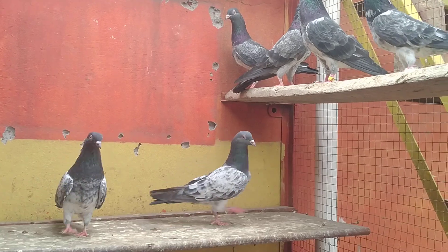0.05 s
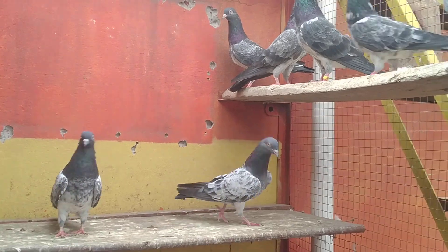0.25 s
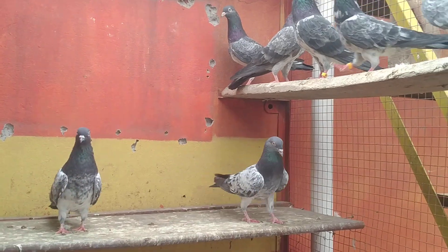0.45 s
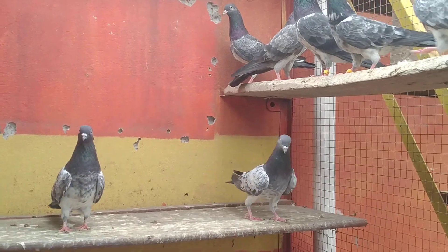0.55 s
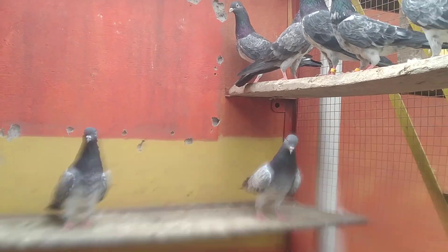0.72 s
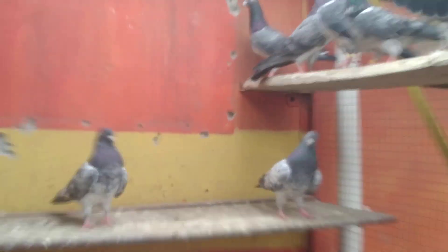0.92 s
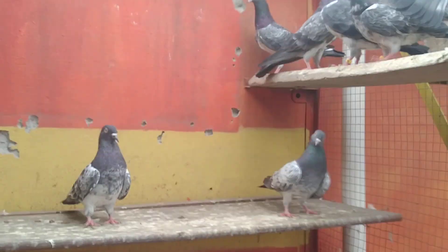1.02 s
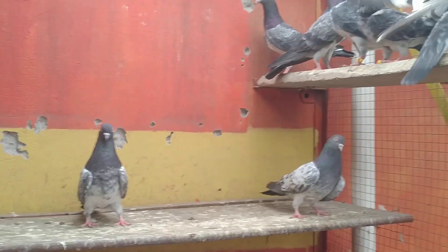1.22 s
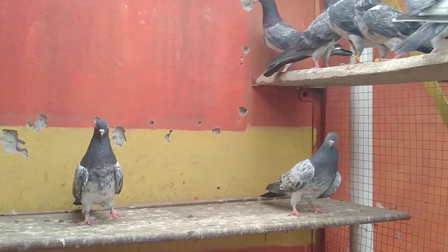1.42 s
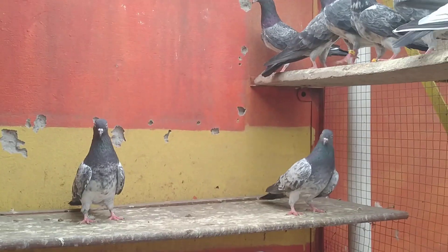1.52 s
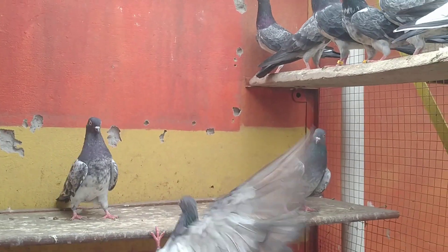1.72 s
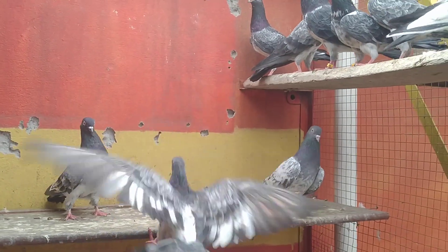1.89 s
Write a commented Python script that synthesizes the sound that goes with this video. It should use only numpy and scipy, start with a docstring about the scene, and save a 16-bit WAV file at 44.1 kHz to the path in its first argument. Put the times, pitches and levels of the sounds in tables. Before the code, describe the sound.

Pigeon wings clap and rattle in rapid irregular strokes after a near-silent start; midway one bird passes very close, its air blast buffeting and overloading the microphone with thuds, then flapping thins out in a small loft.

```python
"""Pigeons beat their wings in a small loft: each stroke is a snap of the wing tips, a short burst of
feather rattle and a tail off the walls, the last two made of noise in three bands.
One bird passes close: its downwash buffets the microphone and pins the diaphragm against its stop for
moments. Wings and feet thud on boards as damped rings; the noisy rustle of the flock and a faint
near-sine coo lie below."""
import sys
import numpy as np
from scipy import signal
from scipy.io import wavfile

SR = 44100
rng = np.random.default_rng(int(sys.argv[2]) if len(sys.argv) > 2 else 0)


def file_out(sig):
    """Save sig as 16-bit WAV at sys.argv[1]."""
    # one column per channel
    cols = np.atleast_2d(sig).T
    # limit, then scale
    lim = np.clip(cols, -1, 1)
    pcm = np.round(lim * 32767).astype(np.int16)
    wavfile.write(sys.argv[1], SR, pcm)


N = 85995
STOP = 1.0      # how far the diaphragm can move inward, in units of full scale
JUMP_S = .0007  # time the diaphragm takes for a sudden move


def undb(db):
    """Turn decibels into a gain; twice the decibels give the gain in power."""
    return 10 ** (np.asarray(db) / 20)


def rms_one(x):
    """Scale a signal to an rms of 1."""
    return x / np.sqrt(np.mean(x ** 2) + 1e-20)


def in_time(rows):
    """Draw straight lines between table rows (time first); one curve for each other column."""
    s, *columns = np.transpose(rows)
    return [np.interp(np.arange(N) / SR, s, c) for c in columns]


def drift(rate_hz):
    """A slow random wander of rms 1: noise smoothed twice, its first second thrown away."""
    r = np.exp(-2 * np.pi * rate_hz / SR)
    slow = signal.lfilter([1], [1, -2 * r, r * r], rng.standard_normal(N + SR))
    return rms_one(slow[SR:])


def coloured(spectrum, patch_db):
    """Noise of rms 1 in third-octave bands; the bands take turns at two noises and four flickers."""
    hz, db = np.transpose(spectrum)
    edges = hz[0] * 2 ** np.arange(0, np.log2(hz[-1] / hz[0]) + 1 / 3, 1 / 3)
    white = rng.standard_normal((2, N))
    flicker = [drift(25) for _ in range(4)]
    out = 0
    for k, (low, high) in enumerate(zip(edges, edges[1:])):
        band_filter = signal.butter(2, [low, high], "band", fs=SR, output="sos")
        band = signal.sosfilt(band_filter, white[k % 2])
        band_db = np.interp(np.log(low * high) / 2, np.log(hz), db)
        out = out + band * undb(band_db + patch_db * flicker[k % 4])
    return rms_one(out)


def wings():
    """Each stroke snaps sharply; its rattle and wall tail add in power to the rustle, in three bands."""
    # when each wing stroke starts: start_s [s]
    stroke_starts = [.102, .1592, .1772, .2028, .2852, .2966, .3396, .4091, .4356, .5113, .5887, .6286,
                     .676, .7518, .7688, .806, .8521, .9, .9274, .954, .9915, 1.0437, 1.0557, 1.0851, 1.118,
                     1.143, 1.1619, 1.2238, 1.2447, 1.2667, 1.311, 1.329, 1.356, 1.4333, 1.5361, 1.5785,
                     1.6398, 1.6817, 1.7361, 1.8299, 1.908]
    # how each stroke sounds: treble_db [dB], middle_db [dB re treble], bass_db [dB re treble],
    # rattle_s [s], snap_db [dB re treble]; treble_db is the stroke's reference level
    strokes = [(-39, -31, -31, .006, -9), (-27, -17, -16, .008, -16), (-17, -7.5, -18.5, .004, -2),
               (-4.5, -17, -25.5, 0.0077, -1), (-19, -14.5, -17, .003, -1), (-13.5, -22, -15, 0.0071, -11),
               (-7, -8, -16, 0.0045, -20), (-16.5, -18, -7.5, 0.027, -12), (-22.5, 1, -12, 0.0064, -1),
               (-24.5, -1.5, -3.5, 0.005, -17), (-17, -5.5, -8, 0.0053, -9.5), (-37, -14, -19, .006, -11),
               (-15, -11, -11.5, 0.003, -5), (-6.5, -11.5, -24, 0.0015, 0), (-10.5, -11, -12, 0.002, -6.5),
               (-14, -2, -3, 0.004, -9), (-15.5, -25, -26, 0.0061, -13), (-8, -3.5, 1.5, .005, 5.5),
               (-27, -4, 15, 0.0024, -6), (-10.5, -14, -8, 0.015, -7), (-7, -3.5, -7.5, 0.02, -8),
               (-25, -19, 11, 0.0035, -2), (-8.5, -2.5, 0, .004, 1), (-13.5, 1.5, 2.5, 0.018, -1),
               (-9.5, -4.5, -28, .003, -0.5), (-9, -2.5, -4, 0.0042, -12), (-7.5, -13, -29, 0.0035, -1.5),
               (-14.5, -8, -5, 0.011, 0), (-14, -4, -8, 0.015, -16), (-7.5, -16, -18.5, 0.0025, 2),
               (-21.5, 4, -3, 0.0028, -7), (-8.5, -6.5, -12, 0.0018, -10.5), (-17, -3, -18, 0.012, -4),
               (-8.5, -9.5, -21, 0.011, -18), (-11.5, -9, -14, 0.011, -2), (-15.5, -5.5, -15, 0.0059, 5),
               (-22, 1.5, -12, 0.0087, -9), (-12, -5.5, -10, 0.008, -0.5),
               (-17.5, -8.5, -18.5, 0.0056, -20), (-23, -9, -19, 0.0074, 0), (-34.5, -9, -24, .006, -6)]
    # trim of treble, middle and bass: trim_db [dB]
    band_trim = [-1.5, 1, 2.5]
    # colour of the feather noise in each band: frequency_hz [Hz], level_db [dB per Hz, shape only]
    treble = [(1470, -30), (2500, -5.5), (3900, -4), (4450, -3), (5770, -1), (6450, -11), (7000, -29.5),
              (9100, -49), (15400, -120)]
    middle = [(650, -16), (1100, 0), (1340, 0.5), (1990, -2.5), (3000, -11.5), (3900, -38), (6600, -120)]
    bass = [(120, -56), (200, -14.5), (448, -2), (637, -1), (700, 0), (1300, -9), (1690, -25), (2860, -120)]
    patch_db = 1.5  # flicker of the noise bands

    t = np.arange(SR // 2) / SR
    flutter = feather_flutter()
    tick = snap(t)
    tail = wall_tail(t)
    snaps = np.zeros(N + SR)
    power = np.zeros((3, N + SR))
    sides = rng.choice([-1, 1], len(strokes))  # each snap pushes or pulls
    for s, (db, middle_db, bass_db, rattle_s, snap_db), side in zip(stroke_starts, strokes, sides):
        i = int(s * SR)
        span = slice(i, i + len(t))
        snaps[span] += side * undb(db + snap_db) * tick
        burst = rattle(t, rattle_s) * flutter[span]
        gains = undb(2 * (db + np.array([0, middle_db, bass_db]) + band_trim))
        power[:, span] += gains[:, None] * (burst + tail)
    power = power[:, :N] + flutter[:N] * rustle()
    noises = [coloured(colour, patch_db) for colour in (treble, middle, bass)]
    return snaps[:N] + sum(np.sqrt(p) * noise for p, noise in zip(power, noises))


def snap(t):
    """The wing tips snap: a 3 kHz ring that dies almost at once, with a peak of 1."""
    decay_s, pitch_hz = 0.00015, 3000
    tick = np.exp(-t / decay_s) * np.sin(2 * np.pi * pitch_hz * t)
    return tick / tick.max()


def rattle(t, rattle_s):
    """Power of the feather rattle: a fast rise, a steady sag, then a steeper fall after rattle_s."""
    rise_s, level_db = 0.00037, -8.5
    sag_db_per_s, fall_t60_s = 397.5, 0.04  # the fall comes on top of the sag
    fall_db = 60 * np.maximum(t - rattle_s, 0) / fall_t60_s
    return undb(2 * (level_db - sag_db_per_s * t - fall_db)) * np.minimum(t / rise_s, 1) ** 2


def wall_tail(t):
    """Power of the sound off the walls: it builds up softly and dies away evenly in decibels."""
    level_db, t60_s, rise_s = -14.5, 0.19, 0.012
    return undb(2 * (level_db - 60 * t / t60_s)) * (1 - np.exp(-t / rise_s))


def feather_flutter():
    """Quick random flutter of the feather noise, as a power of mean 1, with room after the end."""
    rate_hz, depth_db = 500, 1.8
    flutter = undb(2 * depth_db * drift(rate_hz))
    return np.append(flutter / flutter.mean(), np.ones(SR))


def downwash():
    """Air from the close bird: lumpy low turbulence and rumble, a suction and sudden puffs."""
    # downwash on the microphone port: time_s [s], buffeting_db [dB], rumble_db [dB]
    wash_levels = [(0.0, -58.5, -72), (0.13, -65.5, -73), (0.172, -48.5, -70), (0.216, -48, -53),
                   (0.238, -49, -58), (0.282, -41, -49), (0.314, -49, -64), (0.358, -36.5, -64),
                   (0.384, -55, -65), (0.456, -38, -65), (0.498, -52, -69), (0.532, -41, -47.5),
                   (0.624, -46, -56), (0.668, -68, -56), (0.7, -41.5, -49), (0.722, -34, -40),
                   (0.748, -33.5, -50), (0.782, -47.5, -50), (0.802, -20.5, -34), (0.814, -24.5, -41.5),
                   (0.836, -41, -27), (0.858, -37, -41), (0.878, -38, -45), (0.9, -31, -33),
                   (0.944, -19.5, -18), (0.976, -16, -31), (1.014, -29, -38.5), (1.032, -33, -31),
                   (1.042, -35, -42), (1.058, -30, -29), (1.07, -9, -13), (1.09, -17.5, -22),
                   (1.112, -19, -32), (1.134, -30.5, -26), (1.15, -21, -30.5), (1.184, -32, -38),
                   (1.204, -31, -31), (1.226, -40, -32), (1.264, -26.5, -43), (1.292, -43, -52),
                   (1.314, -41, -56), (1.362, -35, -43), (1.394, -41.5, -51), (1.476, -40.5, -50.5),
                   (1.492, -54, -49), (1.514, -69, -48), (1.558, -45, -52.5), (1.64, -47, -44.5),
                   (1.678, -43, -44), (1.77, -42.5, -67), (1.808, -40.5, -61), (1.846, -45, -53),
                   (1.872, -43, -60), (1.95, -49, -62)]
    # colour of the turbulence: frequency_hz [Hz], level_db [dB per Hz, shape only]
    wash_colour = [(76, -24.5), (130, -4), (259, 0.5), (501, -6), (797, -7), (1200, -17.5), (1560, -50),
                   (2640, -120)]
    # edges of the rumble band: edge_hz [Hz]
    rumble_edges = [50.9, 125]
    lump_db, lump_hz = 2.0, 40  # depth and rate of the lumps

    buffeting_db, rumble_db = in_time(wash_levels)
    rumble_filter = signal.butter(2, rumble_edges, "band", fs=SR, output="sos")
    rumble = rms_one(signal.sosfilt(rumble_filter, rng.standard_normal(N)))
    lumps = undb(buffeting_db + lump_db * drift(lump_hz))
    turbulence = lumps * coloured(wash_colour, 2.0)
    return turbulence + undb(rumble_db) * rumble + suction() + puffs()


def suction():
    """Suction leans the diaphragm inward, pulls it well past its stop for moments and lets it go."""
    # diaphragm pinned: start_s [s], end_s [s], jump_onto_stop [full scale], jump_off_stop [full scale]
    pinned = [(.9048, .9207, .3, .07), (.9225, .927, .07, .3), (.939, .9435, .35, .2),
              (1.0068, 1.0432, .5, .75), (1.058, 1.0745, .5, .35), (1.0768, 1.082, .15, .15),
              (1.094, 1.1108, .15, .12)]
    lean_s = .06  # time to lean in before the first pin and to recover after the last
    points = [(0, 0), (pinned[0][0] - lean_s, 0)]
    for start, end, onto, off in pinned:
        points += [(start - JUMP_S, onto - STOP), (start, -STOP), (start + JUMP_S / 2, -4 * STOP)]
        points += [(end - JUMP_S / 2, -4 * STOP), (end, -STOP), (end + JUMP_S, off - STOP)]
    points += [(pinned[-1][1] + lean_s, 0)]
    return in_time(points)[0]


def puffs():
    """Each puff shoves the diaphragm quickly, and the shove dies away."""
    # puffs of air: start_s [s], size [full scale, negative is inward], decay_s [s]
    puff_rows = [(.8102, -.75, .03), (.9315, .6, .002), (.9365, .65, .003), (.9745, .7, .002),
                 (.9778, .6, .003), (1.0446, -.7, .003), (1.0845, .6, .003), (1.0872, -.6, .003),
                 (1.1185, -.35, .004)]
    t = np.arange(N) / SR
    out = np.zeros(N)
    for start, size, decay in puff_rows:
        rise = np.clip((t - start) / JUMP_S, 0, 1)
        out += size * rise * np.exp(-np.maximum(t - start, 0) / decay)
    return out


def thuds():
    """Wings and feet hit boards: each hollow thud is one soft-struck, quickly damped ring."""
    # thuds: start_s [s], pitch_hz [Hz], level_db [dB, before the soft rise], t60_s [s]
    thud_rows = [(.655, 822, -20.5, 0.06), (.694, 653, -13.5, 0.053), (.694, 350, -20, 0.097),
                 (.805, 456, -20, 0.028), (0.929, 250, -17, 0.022), (0.973, 290, -18.5, 0.03),
                 (1.044, 203, -13.5, 0.092), (1.085, 203, -3, 0.02), (1.145, 1115, -7, 0.038),
                 (1.142, 224, -1.5, 0.028), (1.355, 218, -20.5, 0.041)]
    rise_s = 0.004
    out = np.zeros(N)
    for start, hz, db, t60 in thud_rows:
        t = np.maximum(np.arange(N) / SR - start, 0)
        out += undb(db - 60 * t / t60) * (1 - np.exp(-t / rise_s)) * np.sin(2 * np.pi * hz * t)
    return out


def rustle():
    """Power of the flock's steady rustle in treble, middle and bass; the wings turn it into noise."""
    # rustle of the flock: time_s [s], high_db [dB, before the trims below], bass_db [dB]
    rustle_rows = [(0.0, -61, -74), (0.162, -58, -68.5), (0.222, -32.5, -36.5), (0.308, -33, -56),
                   (0.352, -36.5, -41), (0.526, -38, -40), (0.688, -33.5, -41), (0.884, -33.5, -34),
                   (1.08, -40, -42), (1.302, -33.5, -40.5), (1.504, -32.5, -35.5), (1.656, -28, -33.5),
                   (1.738, -39.5, -51.5), (1.824, -40.5, -41.5), (1.95, -50, -58.5)]
    high_db, bass_db = in_time(rustle_rows)
    return undb(2 * np.array([high_db - 3.0, high_db - 6.5, bass_db]))


def coo():
    """A soft near-sine whose pitch glides and whose loudness wavers at random."""
    # coo: time_s [s], pitch_hz [Hz], level_db [dB rms, before the wavering]
    coo_rows = [(0, 397, -61), (.12, 400, -68.5), (.2, 395, -50.5), (.45, 387, -46), (.56, 397, -70),
                (.6, 398, -47), (.66, 379, -44.5), (.72, 370, -67.5)]
    rough_db = 4.5
    hz, db = in_time(coo_rows)
    on = np.arange(N) / SR < coo_rows[-1][0]
    tone = np.sqrt(2) * np.sin(2 * np.pi * np.cumsum(hz) / SR)
    return on * undb(db + rough_db * drift(30)) * tone


def scene():
    """Add all sources into one channel."""
    return (wings() + downwash() + thuds() + coo())[None]


def record(dry):
    """The diaphragm stops dead; then hiss, port resonance, low cuts, treble roll-off, rounded peaks."""
    hiss_db = -66  # before the filters
    port_hz, port_width_hz, port_gain = 4370, 180, .15
    lowcut_hz, lowcut_q = 111, 1.22
    roll_hz, cutoff_hz = 6496, 8300
    top = .6  # level that the peaks are rounded towards

    x = np.maximum(dry, -STOP)
    x = x + undb(hiss_db) * rng.standard_normal(dry.shape)
    x = x + port_gain * signal.lfilter(*signal.iirpeak(port_hz, port_hz / port_width_hz, fs=SR), x)
    # two low cuts: one that rings, one that does not peak
    w = 2 * np.pi * lowcut_hz
    x = signal.lfilter(*signal.bilinear([1, 0, 0], [1, w / lowcut_q, w * w], fs=SR), x)
    x = signal.sosfilt(signal.butter(2, lowcut_hz, "high", fs=SR, output="sos"), x)
    x = signal.sosfilt(signal.butter(12, roll_hz, fs=SR, output="sos"), x)
    x = x / (1 + (x / top) ** 4) ** .25
    # the top is cut again, as rounding adds new treble
    return signal.sosfilt(signal.cheby2(12, 30, cutoff_hz, fs=SR, output="sos"), x)


dry = scene()
out = record(dry)
file_out(out)
```